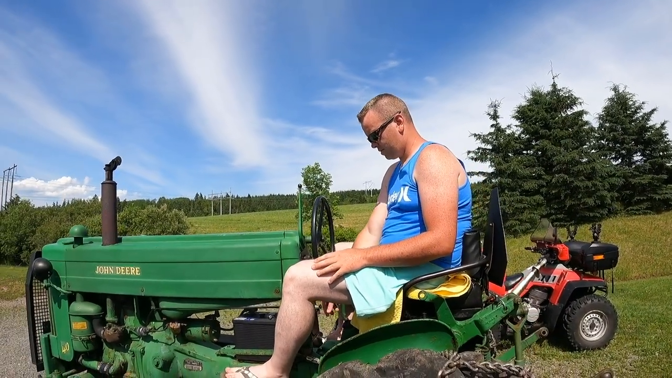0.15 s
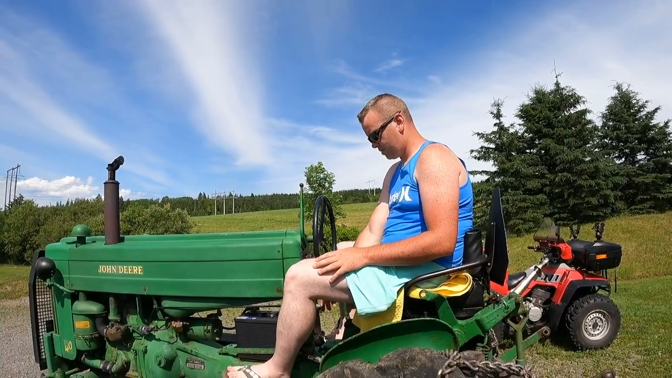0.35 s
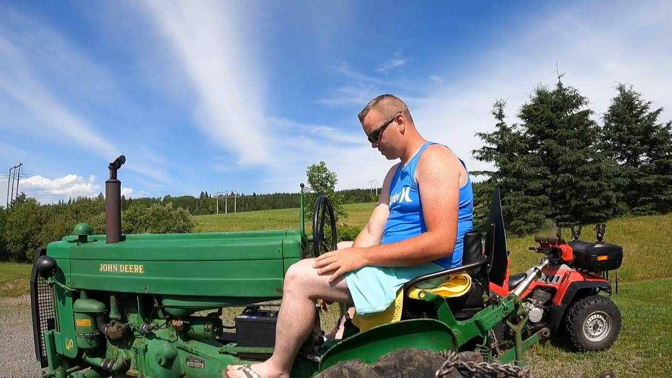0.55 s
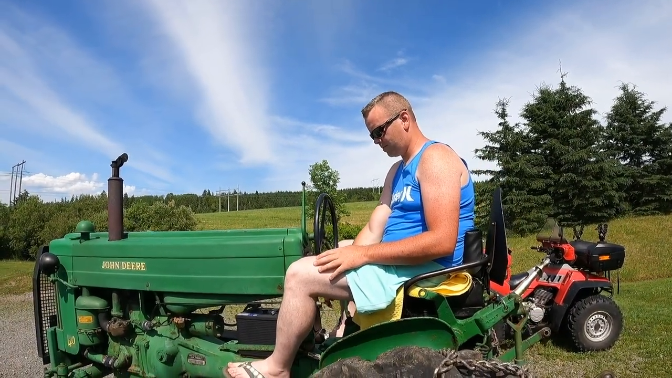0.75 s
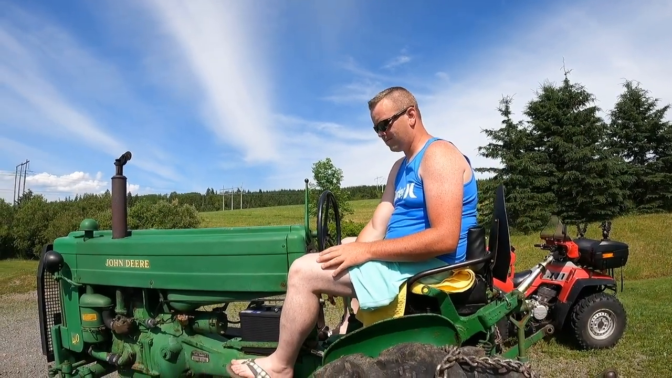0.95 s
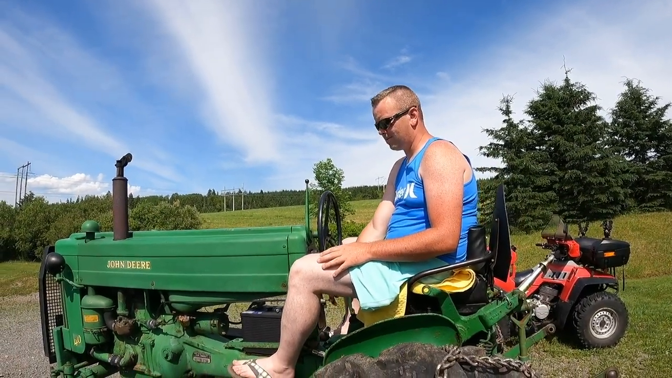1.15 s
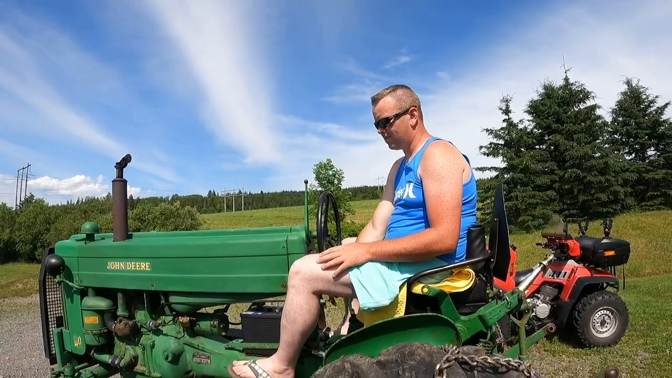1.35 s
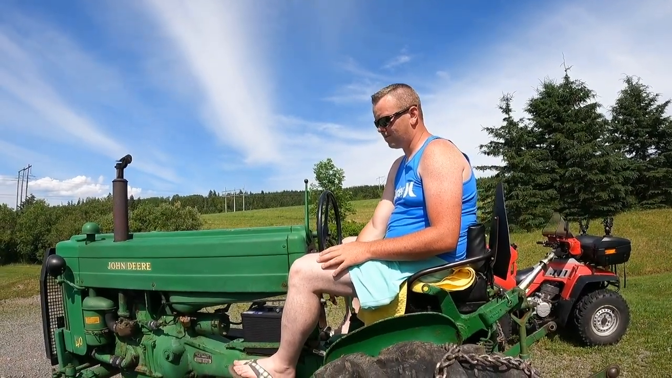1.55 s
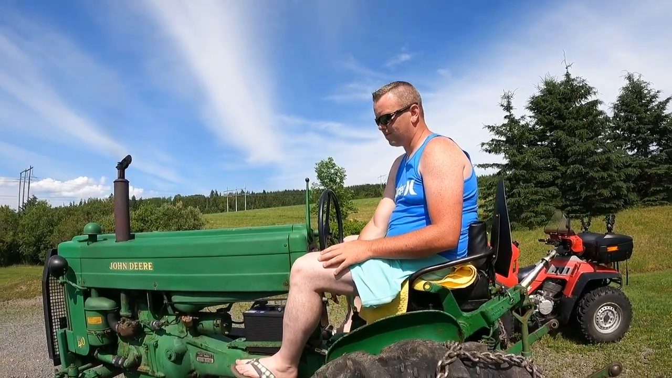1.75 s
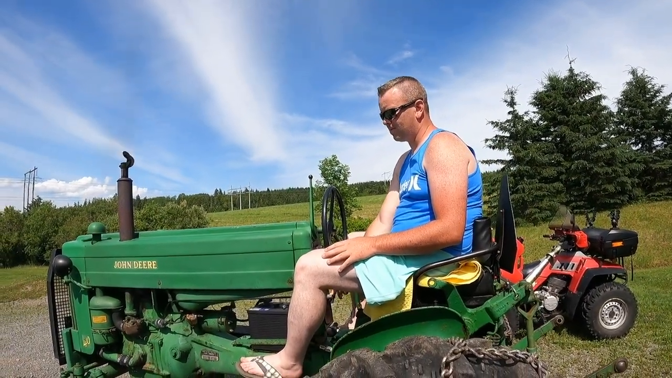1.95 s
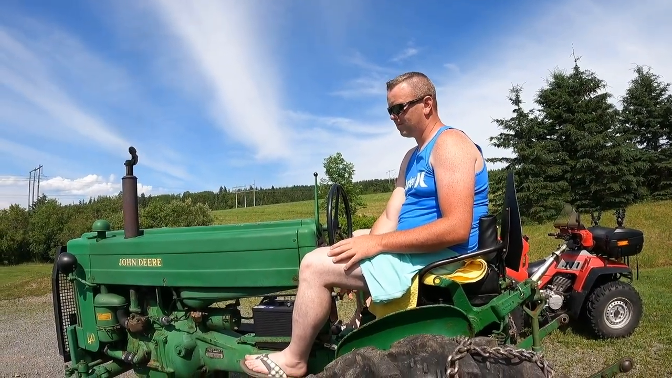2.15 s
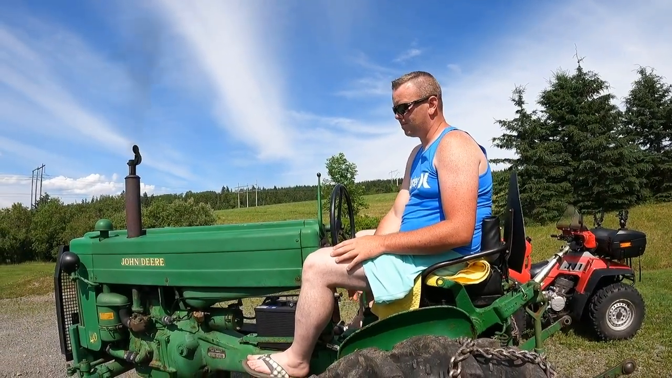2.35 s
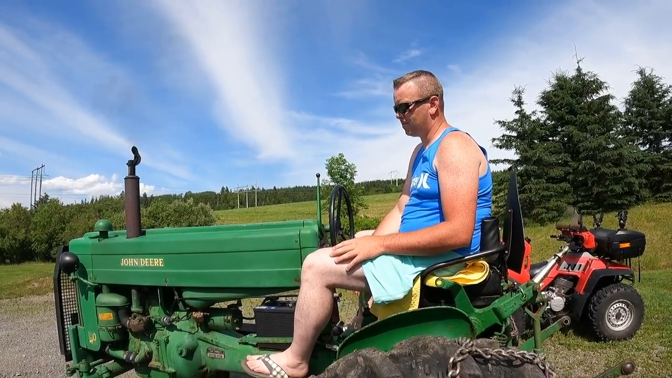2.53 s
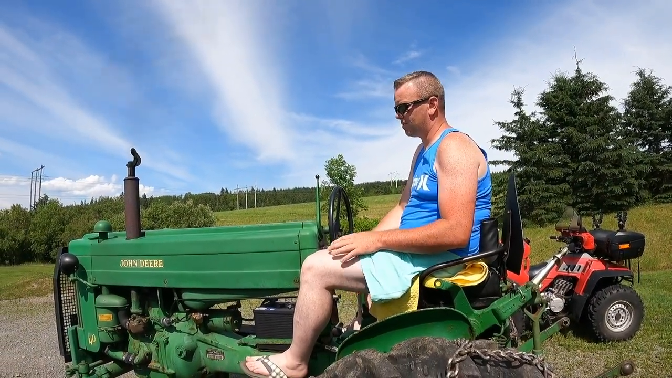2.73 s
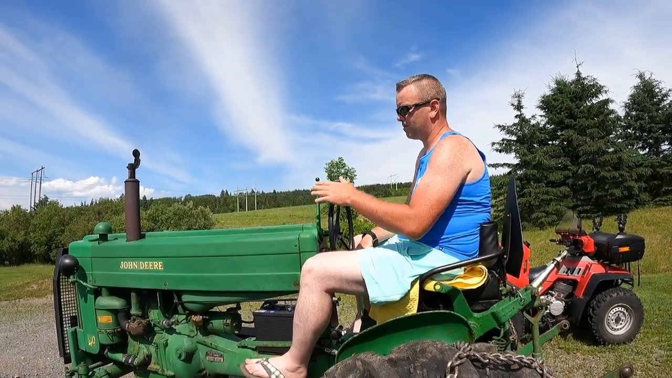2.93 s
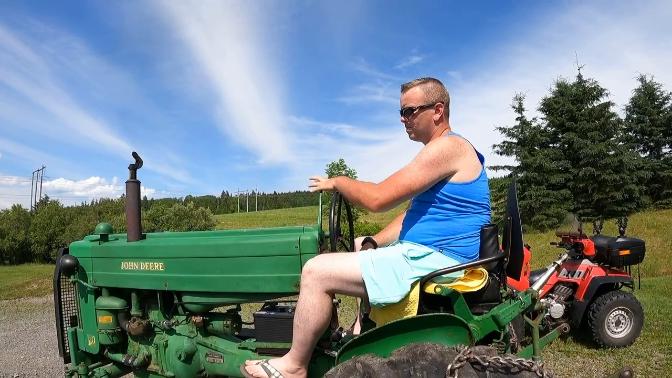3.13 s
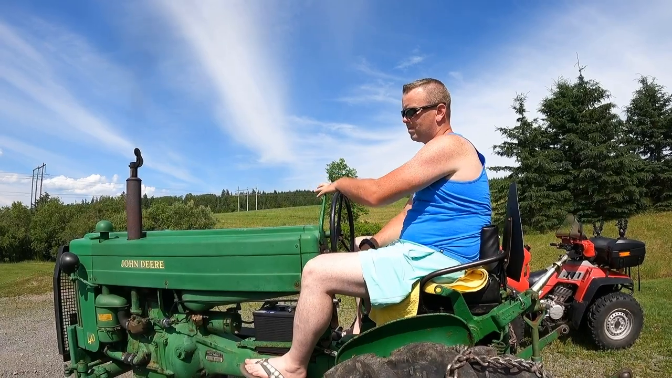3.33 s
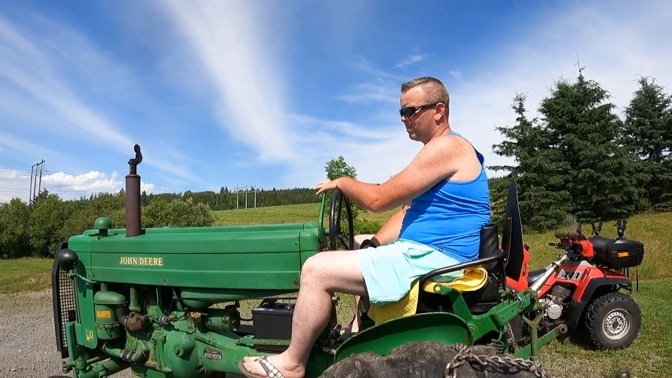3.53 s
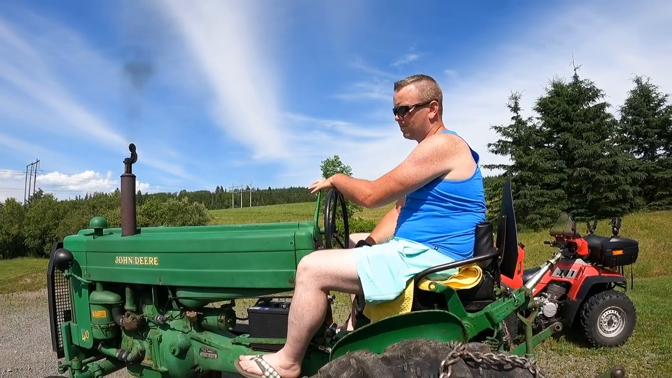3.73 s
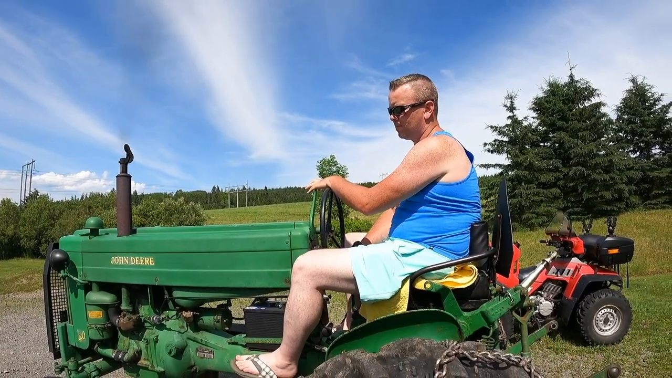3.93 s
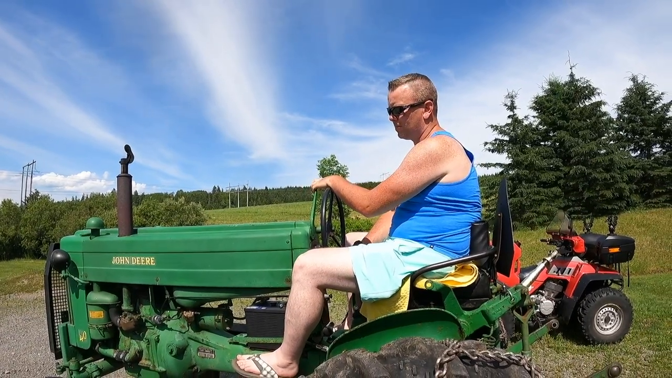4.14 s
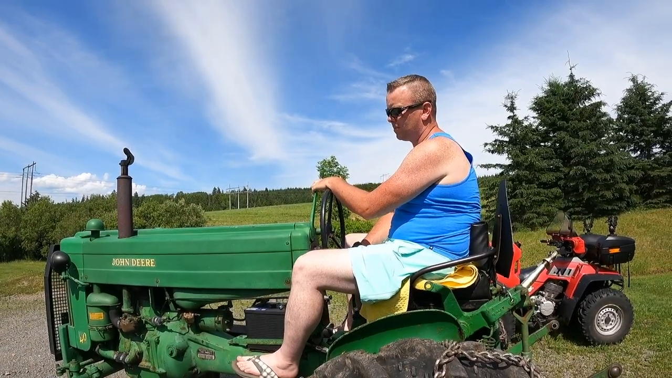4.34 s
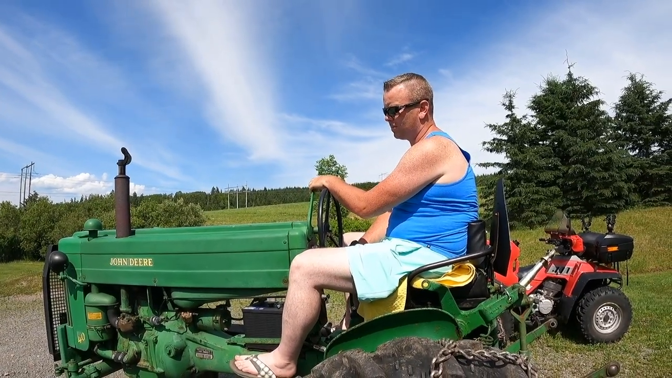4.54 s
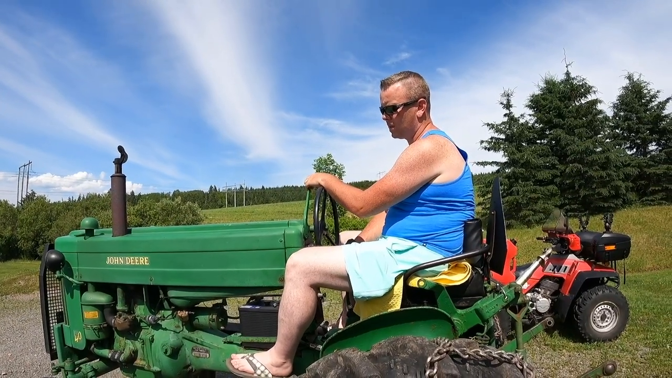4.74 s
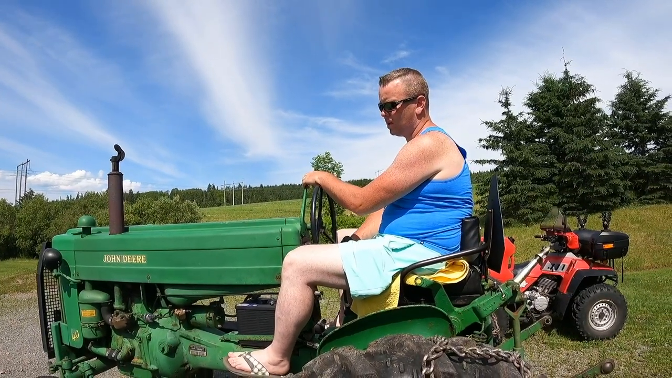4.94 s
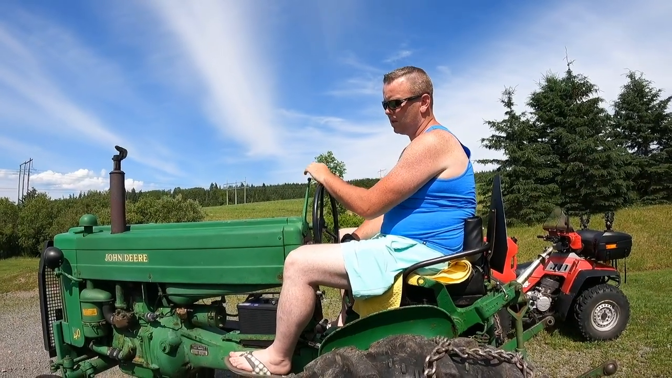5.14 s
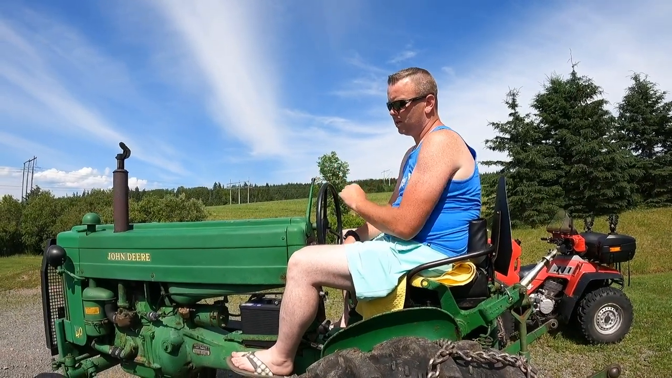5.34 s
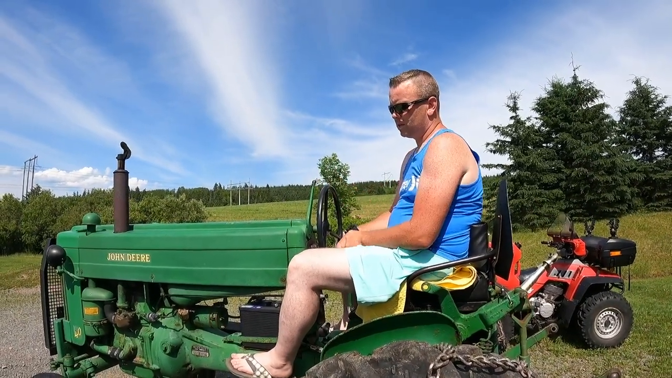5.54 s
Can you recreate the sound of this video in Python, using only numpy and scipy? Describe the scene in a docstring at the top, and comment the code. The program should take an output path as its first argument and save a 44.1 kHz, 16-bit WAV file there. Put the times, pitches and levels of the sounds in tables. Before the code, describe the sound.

A quiet open field, heard close to an old two-cylinder tractor in dry stereo. A faint breeze dies away while small lever ticks sound in the first 0.3 seconds; more light clicks come from 0.5, and a switch snaps at about 0.67. At 0.8 a pinion clanks into the ring gear, and the starter groans downward briefly, then grinds and whines up in pitch until about 1.5, sagging just before the engine catches. A first bang comes at 1.65, followed by scattered, uneven bangs, misfires and breathy puffs, hissing and ringing past a tin rain cap. From about 2.7 the firings grow more regular, quicken after 3.2 and race loudest around 3.5 to 4.1. By 4.2 it eases into a softer fast idle, two thumps close together then a short gap, about ten pairs a second, with valve and tinware clatter over very faint wind until the end near 5.6.

```python
"""An old two-cylinder tractor starts in an open field: a breeze dies away as levers and the switch tick,
the pinion clanks into the ring gear, and the starter groans, grinds and whines up on its tooth rate.
The engine catches with scattered bangs, races, then idles with two firings close together and a pause.
Each firing is a gas pulse that thumps the stack, a noise jet that hisses past the tin rain cap, and ringing metal.
Valve gear and tinware clatter over light wind; two close ports hear it all."""
import sys
import numpy as np
from scipy import signal
from scipy.fft import rfft, irfft, next_fast_len
from scipy.io import wavfile
from scipy.ndimage import uniform_filter1d

SR = 44100
rng = np.random.default_rng(int(sys.argv[2]) if len(sys.argv) > 2 else 0)


def file_out(sig):
    """Save sig as 16-bit WAV at sys.argv[1]."""
    # one column per channel
    cols = np.atleast_2d(sig).T
    # limit, then scale
    lim = np.clip(cols, -1, 1)
    pcm = np.round(lim * 32767).astype(np.int16)
    wavfile.write(sys.argv[1], SR, pcm)


N = 246122
T = np.arange(N) / SR
HZ = np.fft.rfftfreq(next_fast_len(N + SR // 4), 1 / SR)
LONG = 2 * (len(HZ) - 1)  # room for tails, so that none wraps round

# the first bang, with the pinion still meshed: start_s [s], thump_db [dB], hiss_db [dB]
FIRST_BANG = (1.6497, -20, -5.5)
# engine cycles while it catches and races, -50 is a misfire: start_s [s], first_db [dB], second_db [dB]
CATCHING_CYCLES = [(1.7386, -14, -50), (1.94, -14, -9.5), (2.143, -48, -17), (2.3502, -10.5, -7.5),
                   (2.538, -50, -9), (2.7143, -9, -50), (2.888, -9.5, -10), (3.057, -11, -10),
                   (3.2236, -11.5, -11), (3.3889, -8, -7), (3.5311, -6.5, -5), (3.66, -6.5, -5),
                   (3.7815, -6, -5), (3.8967, -6.5, -5), (4.0064, -8.5, -6), (4.1124, -8.5, -8)]
# idle strength of each cylinder: time_s [s], first_db [dB], second_db [dB]
IDLE_STRENGTH = [(4.2, -10.5, -10), (4.4, -13.5, -14), (4.9, -10, -15.5), (5.58, -9.5, -12)]
IDLE_SPREAD_DB = 0.5
IDLE_S, IDLE_CYCLE_S, SLOWING_S = 4.2158, .0999, .00024  # idle starts, first cycle length, growth per cycle
SECOND_LAG = .252  # the second cylinder fires a quarter cycle after the first
# the throttle closes once the engine has raced:
# time_s [s], charge [0 to 1], first_hiss_over_thump_db [dB], second_hiss_over_thump_db [dB]
THROTTLE = [(1.74, 1, -4.5, -1), (1.95, 1, 7, 0.5), (2.8, 1, -2.5, -1.5), (3.6, 1, 1.1, -3),
            (3.9, 1, -0.5, -5), (4.1, 0.75, -2.5, -8), (4.3, 0.06, -7, -5.5), (4.8, 0.41, -10.5, -2),
            (5.58, 0.82, -12, -6.5)]
# muffler knock over thump, racing and idling: first_db [dB], second_db [dB]
KNOCK_RACING_DB = (1.5, -1.5)
KNOCK_IDLING_DB = (-3.5, -24)
KNOCK_SPREAD_DB, KNOCK_LIMIT_DB = 2.5, 3  # scatter from blow to blow, most it may stand over the thump
# gas column under full and light charge: spike_width_s [s], ring_hz [Hz], early_extra_turns [turns],
# ring_life_s [s], overtone_hz [Hz], overtone_share [gain], overtone_life_s [s]
FULL_CHARGE = (.0042, 52.5, 0, .023, 133, -.65, .008)
LIGHT_CHARGE = (.0011, 65.6, .067, .02, 174, .55, .013)
# muffler shell modes: pitch_hz [Hz], level_db [dB], t60_s [s]
SHELL = [(1240, -12, 0.031), (1380, -4, 0.042), (1592, -8, 0.059)]
# tin rain cap modes: pitch_hz [Hz], level_db [dB], t60_s [s]
RAIN_CAP = [(2327, 1.5, 0.095), (1011, -15.5, 0.26), (4880, -30, 0.05), (6400, -35, 0.02)]
CHATTER_DB = -8  # the rain cap rings with each puff, under the puff's level
# puffs of air and rattles without a firing while the engine catches: start_s [s], level_db [dB], t60_s [s]
PUFFS = [(1.677, -12.5, 0.21), (1.732, -17.5, 0.18), (1.864, -16.5, 0.065), (1.884, -18, 0.073),
         (1.909, -22, 0.086), (1.969, -11.5, 0.16), (2.143, -19.5, 0.057), (2.26, -17, 0.12),
         (2.3, -25, 0.093), (2.756, -17.5, 0.063), (2.801, -24.5, 0.051)]
# spectrum of the exhaust jet: pitch_hz [Hz], relative_level_db [dB per Hz]
JET = [(250, -46), (400, -13.5), (740, -13.5), (1170, -8.5), (2020, -1), (3380, 0.5), (4480, 5),
       (6100, -1.5), (7650, -8), (7900, -13), (10000, -21.5), (15900, -60)]
# muffler resonances: pitch_hz [Hz], width_hz [Hz], relative_level_db [dB]
MUFFLER = [(1010, 53, -9.5), (1323, 26, -3.5), (1630, 79, -2), (2333, 73, -3), (2830, 46, -3),
           (3716, 46, -2.5), (4200, 8.9, -8), (4660, 67, 0), (5136, 97, 2), (5910, 230, -1.5),
           (7770, 64, -15)]

# course of valve gear, fan and tinware, before a common lift: time_s [s], level_db [dB]
CLATTER = [(1.55, -35), (2.1, -32), (3.2, -35), (3.9, -28.5), (4.96, -27), (5.58, -28.5)]
CLATTER_LIFT_DB = 1.5
LULL_DB = -4  # the valve gear falls quiet in the last quarter of each cycle
# spectrum of the running gear: pitch_hz [Hz], relative_level_db [dB per Hz]
GEAR = [(76, -46), (130, -1), (290, -2), (580, -12.5), (1150, -19.5), (2300, -11), (3700, -7.5),
        (4700, -11.5), (6000, -9), (7650, -21.5), (7900, -27), (10000, -37.5), (15900, -94)]
# block and tinware resonances: pitch_hz [Hz], width_hz [Hz], relative_level_db [dB]
BLOCK = [(1000, 162, -2.5), (1418, 32, -23), (1724, 410, -3.5), (2330, 75, 2.5), (2947, 71, 2.5),
         (3600, 82, -7.5), (4790, 66, 2.5), (5030, 33, 6), (6200, 150, -3)]

# grind swells with speed, sags at the compression, and overruns for a moment after the engine catches:
# time_s [s], level_db [dB]
GRIND_LEVEL = [(0.821, -19), (.88, -28.5), (.98, -22.5), (1.1, -19.5), (1.53, -16.5), (1.57, -29),
               (1.636, -16), (1.72, -24), (1.77, -36)]
# pinion teeth per second, sagging against the compression: time_s [s], tooth_rate_hz [Hz]
TEETH = [(.82, 200), (1.03, 222), (1.07, 245), (1.22, 287), (1.3, 313), (1.39, 353), (1.46, 357),
         (1.52, 296), (1.62, 285)]
# how loud a tooth tone carries: pitch_hz [Hz], level_db [dB]
WHINE = [(200, -31), (235, -39), (265, -49), (315, -55), (352, -24), (400, -33.5), (465, -42), (500, -24.5),
         (610, -26), (710, -38)]
CLEAN_STRIKES = 0.53  # gain of the clean tooth strikes beside the scrape
UNLOAD_S, UNLOAD_DB = 1.6, -19  # the whine drops when the engine takes over
# spectrum of the grind: pitch_hz [Hz], relative_level_db [dB per Hz]
GRIND = [(71, -63), (120, -21.5), (250, -13.5), (500, -12), (810, -10), (1230, -7.5), (2300, -3.5),
         (5010, -15.5), (7650, -18.5), (7900, -25), (10000, -34), (15900, -103)]
# starter housing resonances: pitch_hz [Hz], width_hz [Hz], relative_level_db [dB]
HOUSING = [(344, 25, -10.5), (539, 65, -12), (1023, 66, -8), (1590, 57, -8.5), (1840, 74, -6.5),
           (2293, 117, -3), (3073, 65, -11.5), (3810, 180, -18), (4656, 48, -11), (5080, 92, -9.5),
           (5540, 110, -14), (6110, 70, -17.5), (6570, 110, -15), (7500, 160, -32)]
# the switch rod and two further switch clicks, then the pinion hitting the ring gear and bouncing: start_s [s],
# level_db [dB], t60_s [s]
KNOCKS = [(0.677, -39.5, 0.4), (0.762, -29, .18), (.786, -21, 0.11), (.8, -9, 0.12), (.814, -19, 0.084),
          (0.833, -22.5, 0.18)]
# the motor groans as it takes the load: start, pitch, fall to the lowest pitch, level, time held, fade
GROAN_S, GROAN_HZ, SAG_HZ_PER_S, LOW_HZ = .8, 351, 760, 211
GROAN_DB, HOLD_S, FADE_DB_PER_S = -31.5, 0.13, 109

# small ticks of levers and linkage: start_s [s], level_db [dB], pitch_hz [Hz]
TICKS = [(.06, -42.5, 2790), (.12, -43, 2640), (.2, -49, 2540), (.265, -55, 1540), (0.501, -52, 2460),
         (.585, -55, 5800), (.615, -44, 6600), (0.634, -38, 5100), (.655, -43, 5530)]
# the starter switch closes in two steps: start_s [s], level_db [dB]
SWITCH_STEPS = [(0.67, -31.5), (0.679, -28)]
# starter switch modes: pitch_hz [Hz], level_db [dB], t60_s [s]
SWITCH = [(1660, -4, 0.028), (1793, 1.5, 0.04), (2600, -5, .04), (4720, 1, 0.053)]

# spectrum of wind rumble and leaves: pitch_hz [Hz], relative_level_db [dB per Hz]
FIELD = [(12, -26), (20, -0.5), (45, -24), (75, -29), (105, -56), (135, -23), (200, -25), (400, -35.5),
         (800, -46.5), (1200, -39.5), (1800, -33.5), (2800, -45.5), (5200, -38.5), (7600, -54),
         (10000, -68), (15900, -100)]
FIELD_DB, GUST_DB, GUST_S = -43, 4.5, 0.19  # steady level; a breeze on top dies away at the start

# left-right likeness of the two ports: pitch_hz [Hz], likeness [0 to 1]
LIKENESS = [(60, 1), (200, 0.99), (350, .99), (480, 0.64), (1000, 0.71), (2500, 0.73), (4500, 0.89),
            (8000, 1), (12000, 0.66)]
# level of left over right: pitch_hz [Hz], left_minus_right_db [dB]
BIAS = [(170, 0), (300, .5), (600, -1.5), (850, -1.5), (1450, 2.5), (2470, 2.5), (4200, -1.5), (7150, -1)]
# phase of left ahead of right: pitch_hz [Hz], left_lead_rad [radians]
LEAD = [(100, 0), (340, .1), (600, 1.3), (950, .5), (1210, .6), (1460, -.4), (1850, -.2), (2150, -.9),
        (3450, -1.5), (3750, .5), (4150, 1.2), (4480, 0)]
ECHO_FLIPS_PER_S = 4.3  # sign changes per second of each scattered echo, which keep the stereo spread even
EDGE_HZ = 15800  # upper band limit


def exhaust():
    """Each firing drives a gas pulse, a turbulent jet and struck metal; softer chuffs and puffs fill in."""
    low, jet, chuff, metal = np.zeros((4, N))
    rows = firings()
    lucks = rng.standard_normal((len(rows), 14))
    throttle_s, charges = np.transpose(THROTTLE)[:2]
    for (s, thump_db, hiss_db, knock_db, second, gap), luck in zip(rows, lucks):
        charge = np.clip(np.interp(s, throttle_s, charges), 0, 1)
        add(low, s - .005, amp(thump_db) * thump(charge))  # the pulse peaks 5 ms in
        add(jet, s - .0005, amp(hiss_db) * burst(.0015, .01, .06))
        add(metal, s + 0.001017, amp(knock_db) * rings(SHELL, 0.021 * luck[:3]))
        cap_db = .5 * hiss_db - 16.5 + 2.5 * luck[3]
        add(metal, s + 0.0068, amp(cap_db) * rings(RAIN_CAP, 0.011 * luck[4:8]))
        if second and thump_db > -40:  # a quarter cycle later a softer chuff, then the cap drops
            add(chuff, s + 0.99 * gap, amp(-20.5) * burst(0.0072, 0.0065, 0.052))
            add(low, s + 1.02 * gap, amp(thump_db - 14) * thump(0.58))
            drop_db = -23.5 + 1.5 * luck[8]
            add(metal, s + 1.3 * gap, amp(drop_db) * rings(RAIN_CAP, 0.0037 * luck[9:13]))
    for s, db, t60 in PUFFS:
        add(chuff, s, amp(db) * burst(0.0059, 0.0028, t60))
        add(metal, s, amp(db + CHATTER_DB) * rings(RAIN_CAP, np.zeros(len(RAIN_CAP))))
    hiss = coloured(jet * rng.standard_normal(N) * flutter(40, .8), JET, [], 0)
    muffled = parts(jet + chuff, MUFFLER, 4.24)
    breath = coloured(chuff * rng.standard_normal(N) * flutter(40, 1.1), JET, [], 0)
    # turbulence in the pulse
    ragged = signal.lfilter(*signal.butter(2, 500, fs=SR), low * rng.standard_normal(N))
    metal *= flutter(150, 3)
    return low + 1.65 * ragged + 0.58 * hiss + 0.26 * muffled + breath + metal


def firings():
    """Firing order as rows: start_s, thump_db, hiss_db, knock_db, cylinder (0 or 1), cylinder_gap_s."""
    k = np.arange(int((N / SR - IDLE_S) / IDLE_CYCLE_S) + 2)
    idle_s = IDLE_S + IDLE_CYCLE_S * k + .5 * SLOWING_S * k * (k - 1)
    time_s, *levels = np.transpose(IDLE_STRENGTH)
    idle = np.transpose([idle_s] + [np.interp(idle_s, time_s, level) for level in levels])
    idle[:, 1:] += IDLE_SPREAD_DB * rng.standard_normal((len(k), 2))
    cycles = np.vstack([CATCHING_CYCLES, idle])
    throttle = np.transpose(THROTTLE)
    rows = [FIRST_BANG + (FIRST_BANG[1], 0, 0)]
    lucks = rng.standard_normal((len(cycles), 2))
    for (start, *dbs), after, luck in zip(cycles, cycles[1:, 0], lucks):
        gap = SECOND_LAG * (after - start)
        knocks_db = KNOCK_RACING_DB if start < IDLE_S else KNOCK_IDLING_DB
        for c in (0, 1):
            hiss_db = dbs[c] + np.interp(start, throttle[0], throttle[2 + c])
            knock_db = dbs[c] + min(knocks_db[c] + KNOCK_SPREAD_DB * luck[c], KNOCK_LIMIT_DB)
            rows.append((start + c * gap, dbs[c], hiss_db, knock_db, c, gap))
    return rows


def thump(charge):
    """Blends the gas pulses of a full and a light charge."""
    return charge * column(*FULL_CHARGE) + (1 - charge) * column(*LIGHT_CHARGE)


def column(width, hz, early, life, over_hz, share, over_life):
    """Pressure spike, then suction and overshoot of the gas in the stack, and a faint long ring."""
    t = T[:SR // 8] - .005
    after = np.maximum(t, 0)
    spike = np.where(t < 0, np.exp(t / .0009), np.exp(-(t / width) ** 2))
    turns = hz * after + early * (1 - np.exp(-after / .003))
    fade = 0.88 * np.exp(-(after / life) ** 2) + 0.11 * np.exp(-after / 0.088)
    ring = -np.sin(2 * np.pi * turns) * fade
    throat = 0.11 * np.sin(2 * np.pi * 270 * after) * np.exp(-after / 0.026)
    overtone = share * np.sin(2 * np.pi * over_hz * after) * np.exp(-after / over_life)
    return spike + ring + throat + overtone


def running_gear():
    """Dense small random taps and hiss that dip once a cycle, and the ringing of block and tinware."""
    s, db = np.transpose(CLATTER)
    lull_db = LULL_DB * np.exp(-((crank() % 1 - .88) / 0.14) ** 2)
    level = amp(np.interp(T, s, db, left=-120) + CLATTER_LIFT_DB + lull_db)
    hits = rng.random(N) < 2500 / SR  # about 2500 taps a second
    taps = hits * amp(6.2 * np.minimum(rng.exponential(1, N), 4.5)) * rng.choice([-1, 1], N)
    raw = (evened(taps) * 0.31 + rng.standard_normal(N)) * flutter(500, 2.05)
    wash = coloured(raw, GEAR, [], 0)
    return wash * level + 0.29 * parts(level, BLOCK, 3.1)


def crank():
    """Engine cycles completed at each moment, from the firings of the first cylinder."""
    starts = [s for s, *_, second, gap in firings() if gap and not second]
    return np.interp(T, starts, np.arange(len(starts)))


def starter():
    """Pinion teeth strike the ring gear: a whine on the tooth rate and a grind that rings the housing."""
    s, db = np.transpose(GRIND_LEVEL)
    hz = np.interp(T, *np.transpose(TEETH))
    turns = np.cumsum(hz) / SR
    on = np.clip((T - s[0]) / 0.022, 0, 1) * np.clip((s[-1] - T) / 0.011, 0, 1)
    load = amp(UNLOAD_DB * np.clip((T - UNLOAD_S) / 0.031, 0, 1))
    whine = load * sum(amp(read(WHINE, k * hz)) * np.sin(2 * np.pi * k * turns) for k in (1, 2))
    # the phase offsets make each strike a short slide
    teeth = evened(sum(np.cos(2 * np.pi * k * turns + k * k / 8) for k in range(3, 40)))
    scrape = rng.standard_normal(N) * flutter(300, 1.27)
    strikes = on * amp(np.interp(T, s, db)) * (CLEAN_STRIKES * flutter(900, 2.2) * teeth + scrape)
    knocks = np.zeros(N)
    for start, knock_db, t60 in KNOCKS:
        add(knocks, start, amp(knock_db) * burst(0.0012, 0.0022, t60))
    grind = coloured(strikes + knocks * rng.standard_normal(N), GRIND, HOUSING, 9.3)
    return on * whine * flutter(250, 3.2) + grind


def groan():
    """The motor's low tone wavers in level and sags in pitch under load."""
    t = np.maximum(T - GROAN_S, 0)
    turns = np.cumsum(np.maximum(GROAN_HZ - SAG_HZ_PER_S * t, LOW_HZ)) / SR
    level = np.clip(t / .02, 0, 1) * amp(GROAN_DB - FADE_DB_PER_S * np.maximum(t - HOLD_S, 0))
    return level * np.sin(2 * np.pi * turns) * flutter(320, 4.9)


def controls():
    """Lever ticks as short pitched noise, and the starter switch as struck modes."""
    out, t = np.zeros(N), T[:900]
    for s, db, hz in TICKS:
        buzz = uniform_filter1d(rng.standard_normal(900), 12) * np.sin(2 * np.pi * hz * t)
        add(out, s, amp(db) * evened(buzz) * burst(0.0015, 0.0017, 0.044)[:900])
    for s, db in SWITCH_STEPS:
        add(out, s, amp(db) * rings(SWITCH, np.zeros(4)) * flutter(60, 3.5)[:SR // 6])
    return out


def field():
    """Light wind rumble and distant leaves: coloured noise under a dying breeze."""
    level = amp(FIELD_DB + GUST_DB * np.exp(-T / GUST_S))
    return level * coloured(rng.standard_normal(N) * flutter(3000, 0.3), FIELD, [], 0)


def rings(modes, detune):
    """Struck modes, decaying sines shifted in pitch by the detune shares."""
    t = T[:SR // 6]
    soft = 1 - np.exp(-t / .0015)
    tones = (amp(db - 60 * t / t60) * np.sin(2 * np.pi * hz * (1 + d) * t)
             for (hz, db, t60), d in zip(modes, detune))
    return soft * sum(tones)


def parts(drive, peaks, depth_db):
    """Each resonance is stirred by its own noise and speaks up now and then, so the colour keeps shifting."""
    out = np.zeros(N)
    for hz, width, db in peaks:
        r = np.exp(-np.pi * width / SR)  # pole radius sets the width
        stir = drive * rng.standard_normal(N) * flutter(700, depth_db)
        poles = [1, -2 * r * np.cos(2 * np.pi * hz / SR), r * r]
        ringing = signal.lfilter([1, 0, -1], poles, stir)
        out += amp(db) * np.sqrt(1 - r) * ringing * np.sqrt(width / 100)
    return signal.sosfilt(signal.butter(6, 7400, fs=SR, output="sos"), out)


def coloured(x, spectrum, peaks, lift_db):
    """Broad colour plus resonances that stand lift_db above it; white noise keeps its level."""
    bumps = sum(amp(db - read(spectrum, f)) / (1 + 2j * (HZ - f) / width) for f, width, db in peaks)
    gain = amp(read(spectrum, HZ)) * (1 + amp(lift_db) * bumps)
    return irfft(rfft(x, LONG) * gain / np.sqrt(np.mean(abs(gain) ** 2)), LONG)[:N]


def flutter(size, depth_db):
    """Random gain that changes over about size samples, depth_db rms."""
    smooth = uniform_filter1d(uniform_filter1d(rng.standard_normal(N), size), size)
    return amp(depth_db * evened(smooth))


def burst(rise, hold, t60):
    """Envelope: quick rise, hold, exponential fall."""
    t = T[:SR // 5]
    return (1 - np.exp(-t / rise)) * amp(-60 * np.maximum(t - hold, 0) / t60)


def amp(db):
    """Decibels to gain."""
    return 10 ** (np.asarray(db) / 20)


def evened(x):
    """Scales to rms 1."""
    return x / np.sqrt(np.mean(x ** 2) + 1e-20)


def read(points, hz):
    """Reads a spectrum on a log frequency axis."""
    f, value = np.transpose(points)
    return np.interp(np.log(hz + 1), np.log(f + 1), value)


def add(mix, s, sound):
    """Mixes a sound in at time s."""
    part = mix[round(s * SR):][:len(sound)]
    part += sound[:len(part)]


def scene():
    """Two close ports: level and phase differ with pitch; scattered echoes of each source set the spread."""
    same = np.clip(read(LIKENESS, HZ), 0, 1)
    tilt = amp(read(BIAS, HZ) / 2) * np.exp(.5j * read(LEAD, HZ))
    common = apart = 0
    for source in (exhaust(), running_gear(), starter() + groan() + controls(), field()):
        common = common + rfft(source, LONG)
        for k in range(4):  # four echo patterns overlap at constant total power
            scatter = rng.standard_normal(6000) * amp(-60 * T[:6000] / 0.057)
            echo = rfft(scatter / np.linalg.norm(scatter), LONG)
            turn = np.cos(np.pi * (ECHO_FLIPS_PER_S * T + k / 4)) / np.sqrt(2)
            apart = apart + rfft(source * turn, LONG) * echo
    common = np.sqrt((1 + same) / 2) * common
    apart = np.sqrt((1 - same) / 2) * apart
    left, right = (common + apart) * tilt, (common - apart) / tilt
    return irfft(np.array([left, right]), LONG)[:, :N]


def record(dry):
    """The loudest bangs clip; then the band limit."""
    clipped = np.clip(dry, -1, 1)
    lowpass = signal.firwin(511, EDGE_HZ, window=("kaiser", 9), fs=SR)
    return signal.oaconvolve(clipped, lowpass[None], "same")


dry = scene()
out = record(dry)
file_out(out)
```